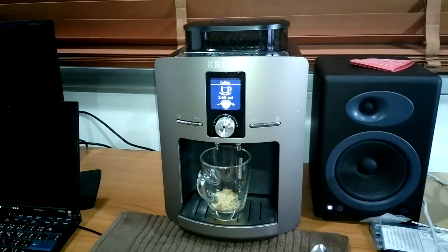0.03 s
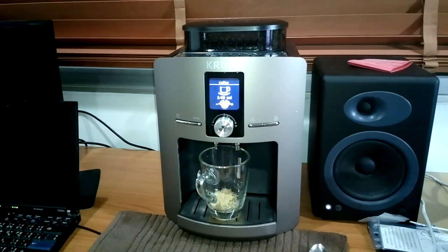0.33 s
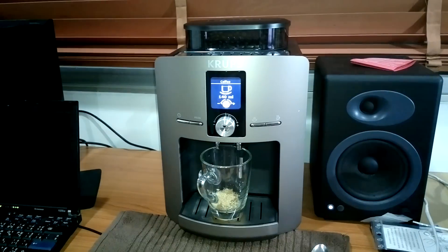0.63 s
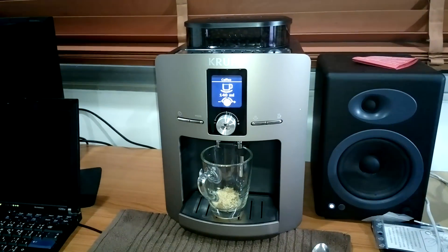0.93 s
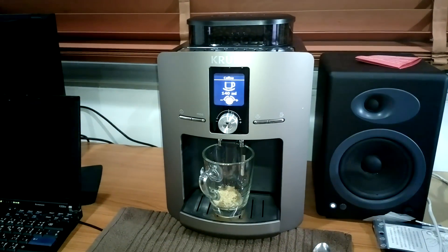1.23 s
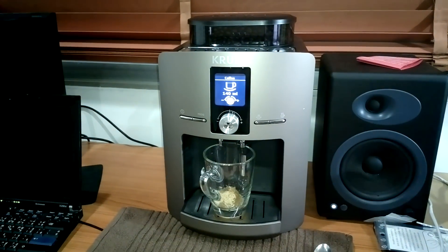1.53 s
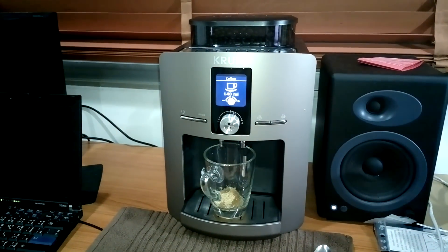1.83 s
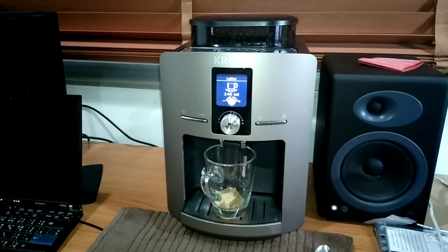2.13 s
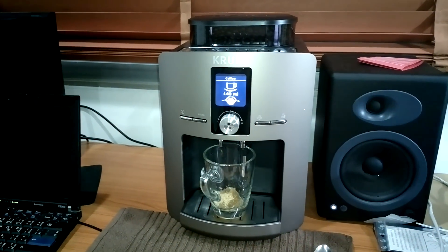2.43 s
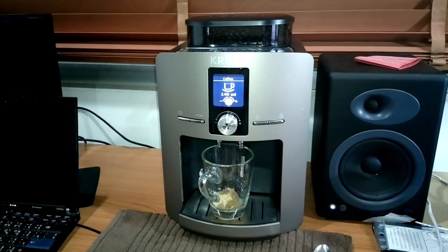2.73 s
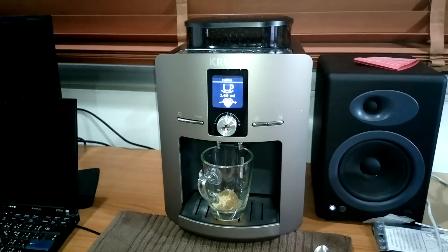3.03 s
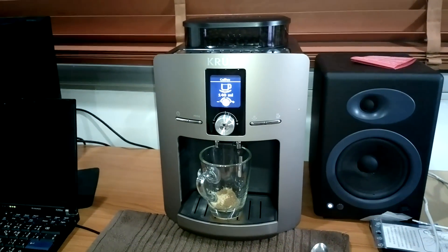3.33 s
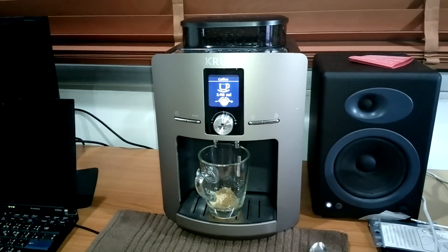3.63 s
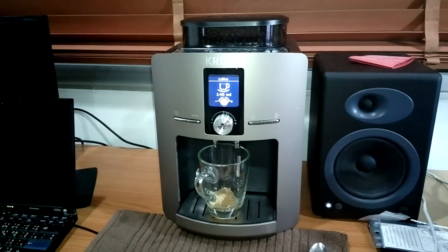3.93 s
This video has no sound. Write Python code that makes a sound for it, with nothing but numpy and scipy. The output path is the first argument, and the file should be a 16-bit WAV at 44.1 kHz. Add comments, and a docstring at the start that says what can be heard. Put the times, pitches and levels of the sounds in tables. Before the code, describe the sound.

An espresso machine pump buzzes and rattles, then cuts off with a dull clunk.

```python
"""Espresso machine finishing a cup

In a small room, a mains-driven piston pump hums, buzzes, rattles its case, hisses and sputters.
The pump cuts out, the machine rocks on its feet and a valve clunks shut. Later come a sharp click
and a tiny rising squeak of escaping air. Faint drips, popping foam and a low room hum remain."""
import sys
import numpy as np
from scipy import signal
from scipy.fft import rfft, irfft, next_fast_len
from scipy.io import wavfile
from scipy.ndimage import map_coordinates

SR = 44100
rng = np.random.default_rng(int(sys.argv[2]) if len(sys.argv) > 2 else 0)


def to_wav(sig):
    """Store sig (one row per channel, or 1-D mono) as 16-bit WAV at the path in sys.argv[1].

    Samples outside -1..1 are clipped; the rate is SR.
    """
    pcm = np.clip(np.atleast_2d(sig), -1, 1) * 32767
    pcm = np.round(pcm).astype(np.int16)
    wavfile.write(sys.argv[1], SR, pcm.T)  # frames by channels


N = 176400
MAINS_HZ, PUMP_STOP_S = 50, 0.629  # the piston makes one stroke per mains cycle


def amp(db):
    """Turn decibels into a gain."""
    return 10 ** (np.asarray(db) / 20)


def unit(x):
    """Scale a signal to an average (rms) size of 1."""
    return x / np.sqrt(np.mean(x ** 2) + 1e-20)


def along(points, hz):
    """Read between the rows of a (frequency, value) table, on a log frequency scale."""
    freqs, values = np.transpose(points)
    return np.interp(np.log(hz + 1), np.log(freqs + 1), values)


def since(start_s):
    """Seconds since a moment, zero before it."""
    return np.maximum(np.arange(N) / SR - start_s, 0)


def fade(start_s, fade_s):
    """Full level until start_s, then 60 dB quieter every fade_s."""
    return np.exp(-np.log(1000) * since(start_s) / fade_s)


def onset(start_s, rise_s):
    """A soft start, from silence up to full level."""
    return 1 - np.exp(-since(start_s) / rise_s)


def wobble(per_s):
    """A smooth curve through per_s random values a second."""
    return map_coordinates(rng.standard_normal(int(N * per_s / SR) + 4), [np.arange(N) * per_s / SR])


def filtered(x, response):
    """Multiply each frequency in x by response(hz)."""
    size = next_fast_len(N + SR // 2)
    return irfft(rfft(x, size) * response(np.fft.rfftfreq(size, 1 / SR)), size)[..., :N]


# How alike the two ears hear the room (1 = the same): freq_hz, likeness
EAR_LIKENESS = [(120, 1), (400, 0.87), (900, 0.56), (1500, 0.083), (2800, 0.086), (12000, 0.063)]
def spread(pair):
    """Mix two unrelated signals into left and right, alike in the bass."""
    turn = lambda hz: np.arccos(np.clip(along(EAR_LIKENESS, hz), -1, 1)) / 2
    mid, side = filtered(pair, lambda hz: np.array([np.cos(turn(hz)), np.sin(turn(hz))]))
    return np.array([mid + side, mid - side])


def colour(x, tone):
    """Shape x with a tone table, then scale it to size 1."""
    return unit(filtered(x, lambda hz: amp(along(tone, hz))))


def noise(tone):
    """Stereo noise shaped by a tone table."""
    return colour(spread(rng.standard_normal((2, N))), tone)


def panned(x, pan):
    """Lean each frequency to the left or right."""
    return filtered(x, lambda hz: amp(np.outer([1, -1], along(pan, hz)) / 2))


def lagged(x, lag_s=0.00013):
    """The sound reaches the left ear just after the right."""
    return filtered(x, lambda hz: np.exp(-1j * np.pi * lag_s * np.outer([1, -1], hz)))


def ring(start_s, notes, blur_rad=0):
    """A struck object's fading notes; blur makes them waver, as loose panels do."""
    return sum(amp(db) * fade(start_s, fade_s)
               * np.sin(2 * np.pi * hz * since(start_s) + blur_rad * wobble(70))
               for hz, db, fade_s in notes)


def puff(start_s, tone, fade_s):
    """A short burst of noise as two things touch."""
    return noise(tone) * (since(start_s) > 0) * fade(start_s, fade_s)


# How long the room's echo lasts: freq_hz, fade_s
ECHO_FADES = [(100, 0.62), (500, 0.22), (3000, 0.2), (8000, 0.19), (15000, 0.23)]
def room(x, echo_db):
    """The direct sound plus a soft wash of echo from the walls."""
    hz, t, bands = signal.stft(rng.standard_normal((2, SR // 2)), SR, nperseg=256)
    decay = np.exp(-np.log(1000) * t / along(ECHO_FADES, hz)[:, None])
    tail = signal.istft(bands * decay, SR, nperseg=256)[1]
    tail = spread(np.pad(tail, ((0, 0), (180, 0))))[:, :SR // 2]  # the echo comes 4 ms late
    echo = signal.fftconvolve(x, tail / np.linalg.norm(tail[0]), axes=1)[:, :N]
    return x + amp(echo_db) * echo


# Swells of the low room hum: time_s, level_db
ROOM_HUM_LEVELS = [(.8,-55.5),(1.15,-53.5),(1.75,-59),(1.98,-50.5),(2.11,-67),(2.29,-57.5),(2.7,-59),(2.84,-51.5),(2.95,-65),(3.05,-55),(3.5,-59.5),(3.65,-51.5),(3.83,-56),(3.95,-50)]
# Tone of the room noise: freq_hz, relative_db
ROOM_TONE = [(22, -15.5), (44, 1), (66, -1), (125, 1), (160, -9.5), (195, -1), (300, -13), (380, -11.5),
             (500, -18), (2100, -20.5), (3000, -26.5), (4400, -26), (6200, -35.5), (8500, -36.5),
             (11000, -41), (15500, -42)]
# Which side the background leans to: freq_hz, left_minus_right_db
ROOM_PAN = [(100, 3), (600, 2.5), (2000, -4), (4000, 0.5)]
def background(hum_hz=47.05):
    """Steady room noise and a low hum that swells and sinks."""
    t = since(0)
    level_db = np.interp(t, *np.transpose(ROOM_HUM_LEVELS))
    hum = np.sqrt(2) * np.sin(2 * np.pi * hum_hz * t + 0.55 * wobble(8.6))
    return panned(amp(level_db) * hum + amp(-57.5) * noise(ROOM_TONE), ROOM_PAN)


# Tone of a tiny wet tick, for bubbles and drips alike: freq_hz, relative_db
WET_TONE = [(3000, -23), (7000, -1), (10500, -3.5), (15500, -12)]
def foam(bubbles=24):
    """Tiny bubbles burst at random as the foam settles in the cup."""
    pops = np.zeros(N)
    for when, size in rng.random(size=(bubbles, 2)):
        pops[int(when * N)] = amp(-56 - 5 * np.log(1 - 0.9 * size))  # most are faint
    wet_pops = filtered(np.array([pops, pops]), lambda hz: amp(along(WET_TONE, hz)))
    return room(wet_pops, echo_db=-2)


# Drips at the spout, then pops of the settling foam from 2.5 s on: start_s, level_db
WET_TICKS = [(1.061, -67), (1.305, -54), (1.5093, -66), (2.577, -68), (2.839, -71), (3.345, -75), (3.502, -68),
             (3.605, -71), (3.701, -71), (3.8186, -66)]
def wet_ticks():
    """Each drip or foam pop makes a faint wet tick."""
    ticks = sum(amp(db) * puff(start_s, WET_TONE, fade_s=0.018) for start_s, db in WET_TICKS)
    return room(ticks, echo_db=1)


def air_squeak(start_s=1.3045, length_s=0.024, from_hz=6400, climb_hz_per_s=240000):
    """Escaping air makes one tiny, unsteady whistle that glides upward."""
    age = np.minimum(since(start_s), length_s)
    pitch_hz = (from_hz + climb_hz_per_s * age) * (1 + 0.064 * wobble(1500))
    swell = np.sqrt(np.abs(np.sin(np.pi * age / length_s)))
    squeak = amp(-65.5) * swell * np.sin(2 * np.pi * np.cumsum(pitch_hz) / SR)
    return room(np.array([squeak, squeak]), echo_db=0)


# Ringing notes of the click: pitch_hz, relative_db, fade_s
CLICK_NOTES = [(4200, -26, .12), (4310, 1, 0.022), (4850, -18, 0.017), (6200, -16, 0.018),
               (7300, -11, 0.016)]
# Tone of the click's snap: freq_hz, relative_db
SNAP_TONE = [(1500, -40), (3700, -13), (4400, 17), (8500, 0), (15500, -24)]
def click(start_s=1.2675):
    """One hard, bright click from inside the machine, a little to the left."""
    hit = ring(start_s, CLICK_NOTES) + amp(2) * puff(start_s, SNAP_TONE, fade_s=0.016)
    return room(amp(-44.5) * hit * amp([[1.5], [-1.5]]), echo_db=-4)


# Low notes of the machine on its feet: pitch_hz, level_db, fade_s
FEET_NOTES = [(35.1, -39, 0.75), (103.4, -43, 0.82)]
def rocking_feet():
    """The machine rocks on its feet as the pump stops."""
    return ring(PUMP_STOP_S, FEET_NOTES)


# Blows of the closing valve: start_s, gain_db
VALVE_BLOWS = [(0.6385, -27), (.646, -31)]
# Ringing notes of the case: pitch_hz, relative_db, fade_s
CASE_NOTES = [(447, -14, .24), (657, -13, .2), (781, -18, .23), (960, -4.5, .03), (1110, 1.5, .028),
              (1360, -14, .03), (2090, -4, .02)]
# Tone of each blow's thud: freq_hz, relative_db
THUD_TONE = [(150, -6), (450, 3), (1000, 4), (1700, -13), (3000, -13), (5000, -24.5), (10000, -54)]
def valve():
    """The valve shuts with a dull double blow that rings the case."""
    blows = np.zeros((2, N))
    for start_s, db in VALVE_BLOWS:
        ringing = ring(start_s, CASE_NOTES, blur_rad=0.8)
        thud = amp(-6) * puff(start_s, THUD_TONE, fade_s=0.15)
        blows += amp(db) * onset(start_s, rise_s=0.0005) * (ringing + thud)
    return room(blows, echo_db=-4.5)


# Sputters of water in the pump: start_s, pitch_hz, gain_db
WATER_SPUTTERS = [(.225, 940, -43), (.277, 1970, -38.5), (0.313, 1220, -38.5), (0.514, 1950, -42.5)]
def sputters(sharpness=2.8):
    """Short hollow bursts as water and air pass through the pump."""
    bursts = np.zeros((2, N))
    for start_s, pitch_hz, db in WATER_SPUTTERS:
        peak = lambda ratio: ratio / (sharpness * (1 - ratio ** 2) + 1j * ratio)
        hollow = unit(filtered(rng.standard_normal(N), lambda hz: peak(hz / pitch_hz) ** 2))
        bursts += amp(db) * hollow * onset(start_s, rise_s=0.0027) * fade(start_s, fade_s=0.083)
    return room(bursts, echo_db=-7)


# Tone of the pump's hiss: freq_hz, relative_db
HISS_TONE = [(1500, -25), (3300, -5), (4800, 2), (6100, -4.5), (7000, 0), (7600, -0.5), (8400, 2.5),
             (9500, -5), (12500, -16.5), (15500, -28)]
def pump_hiss(first_s=0.0084, rise_s=0.0015, decay_s=0.005, stop_s=0.62, release_s=0.089):
    """Over a steady hiss, each stroke forces out a gritty spurt that dies away before the next."""
    t = since(0)
    steady = noise(HISS_TONE)
    age = (t - first_s) % (1 / MAINS_HZ)
    spurts = unit((1 - np.exp(-age / rise_s)) * np.exp(-age / decay_s))
    strength = amp(-4 + 2 * wobble(MAINS_HZ))  # no two spurts are equal
    grit = amp(2.2 * wobble(600) + wobble(11.4))  # fast grain and a slow swell
    hiss = unit(steady * (1 + strength * spurts) * grit)
    flowing = np.clip((stop_s - t) / release_s + 0.5, 0, 1)
    return room(flowing * amp(-54.5) * hiss, echo_db=-6.5)


# The pump's hum at 1, 2, 3... times the stroke rate: left_db, right_db
HUM_LEVELS = [(-54, -56), (-43, -45), (-56, -58), (-42, -42), (-57, -55), (-46, -51), (-52, -57),
              (-52, -57), (-47, -57), (-45, -47), (-51, -46), (-57, -58), (-50, -59), (-57, -60),
              (-61, -56)]
def pump_hum(first_s=0.00503, back_delay_s=0.0109, back_strength=0.82, node_hz=500):
    """The piston's two blows per cycle shake the case into a stack of notes; low ones ring longest."""
    hum = np.zeros((2, N))
    t = since(0) - first_s
    for multiple, ears_db in enumerate(HUM_LEVELS, start=1):
        hz = multiple * MAINS_HZ
        # the back stroke shifts where each wave starts
        shift = np.angle(1 + back_strength * np.exp(-2j * np.pi * hz * back_delay_s))
        phase = 2 * np.pi * hz * t + shift + rng.normal(0, 0.6) + 0.04 * wobble(16)
        # at node_hz a still spot of the room lies between the ears, so they swing opposite ways
        ears = amp(ears_db) * [1, -1 if hz == node_hz else 1]
        hum -= ears[:, None] * np.sqrt(2) * np.cos(phase) * fade(PUMP_STOP_S, fade_s=1 / multiple)
    return hum


# Tone of the pump's buzz: freq_hz, relative_db
BUZZ_TONE = [(600, -40), (780, -5), (1150, 5), (1400, -8), (4000, -41)]
# Tone of the loose rattle: freq_hz, relative_db
RATTLE_TONE = [(27, -25), (39, 14), (75, 1), (170, -4.5), (360, 0), (425, 7.5), (540, 0), (1000, 2.5),
               (1500, -3.5), (2300, -7.5), (3300, -15.5), (6000, -42)]
def pump_buzz_and_rattle(knock_s=0.0032, knock_db=2, rough_db=2.5, release_s=0.0072):
    """The piston knocks at both ends of its stroke, making a repeating buzz and a loose rattle."""
    t = since(0)
    knocks = amp(knock_db * np.cos(2 * np.pi * 2 * MAINS_HZ * (t - knock_s)))
    stroke_samples = SR // MAINS_HZ
    one_stroke = rng.standard_normal((2, stroke_samples))
    strokes = one_stroke[:, np.arange(N) % stroke_samples]
    buzz = colour(spread(strokes * knocks), BUZZ_TONE)
    rattle = unit(noise(RATTLE_TONE) * knocks * amp(rough_db * wobble(300)))
    running = np.clip((PUMP_STOP_S - t) / release_s + 0.5, 0, 1)
    return room(running * (amp(-53.5) * buzz + amp(-42) * rattle), echo_db=-3.5)


# Which side the machine's sound leans to: freq_hz, left_minus_right_db
MACHINE_PAN = [(100, 5.5), (430, 4), (600, 0), (1100, -3.5), (2000, -7), (3200, 1), (5500, 2), (9500, 4.5),
               (12000, -1)]
def scene():
    """The machine in its room, with the small sounds on top."""
    machine = pump_buzz_and_rattle() + pump_hiss() + sputters() + valve() + rocking_feet()
    machine_in_room = lagged(pump_hum() + panned(machine, MACHINE_PAN) + background())
    return machine_in_room + click() + air_squeak() + wet_ticks() + foam()


def record(dry, top_hz=15750):
    """Cut away the very highest treble."""
    return filtered(dry, lambda hz: hz < top_hz)


dry = scene()
out = record(dry)
to_wav(out)
```